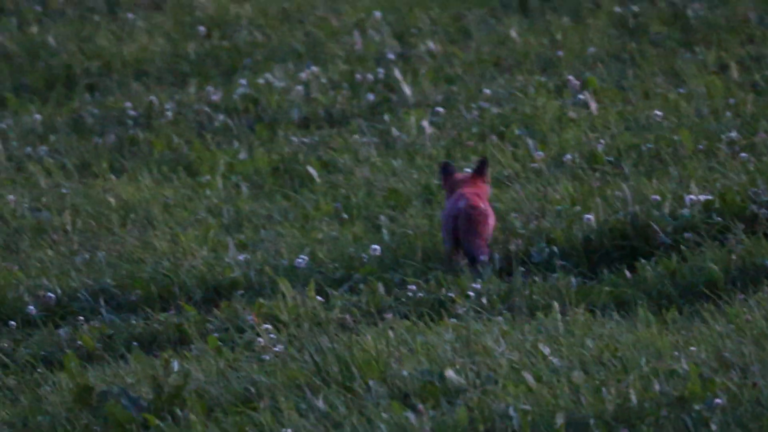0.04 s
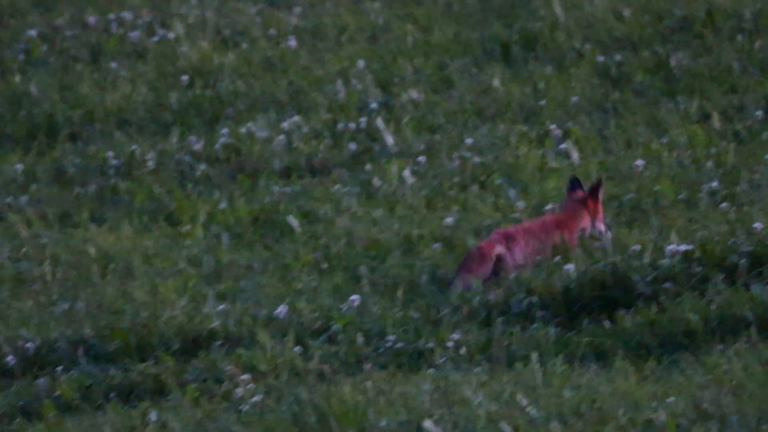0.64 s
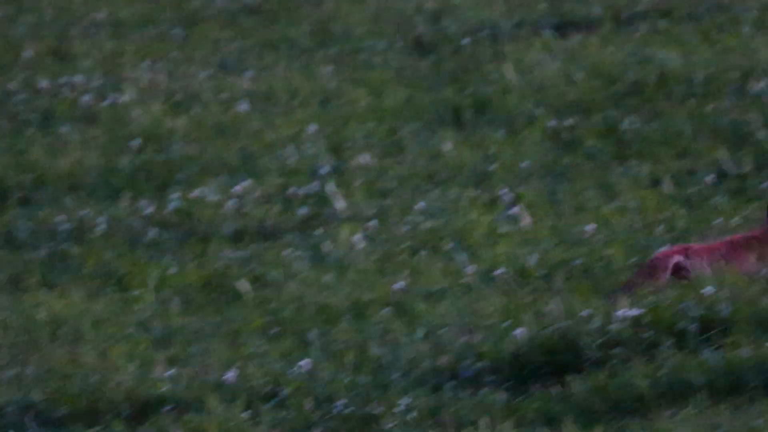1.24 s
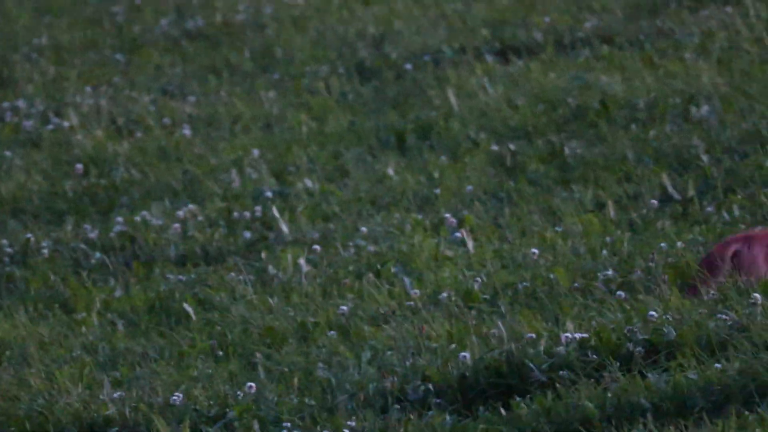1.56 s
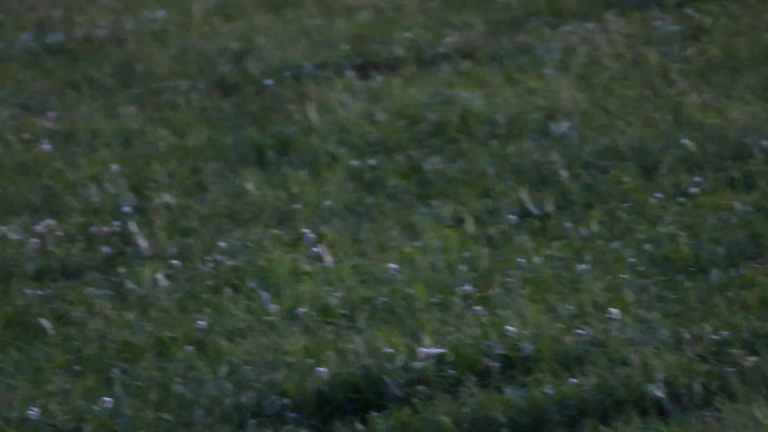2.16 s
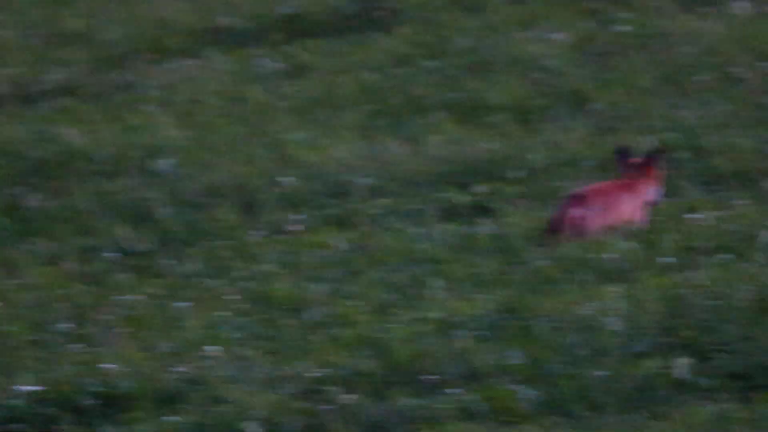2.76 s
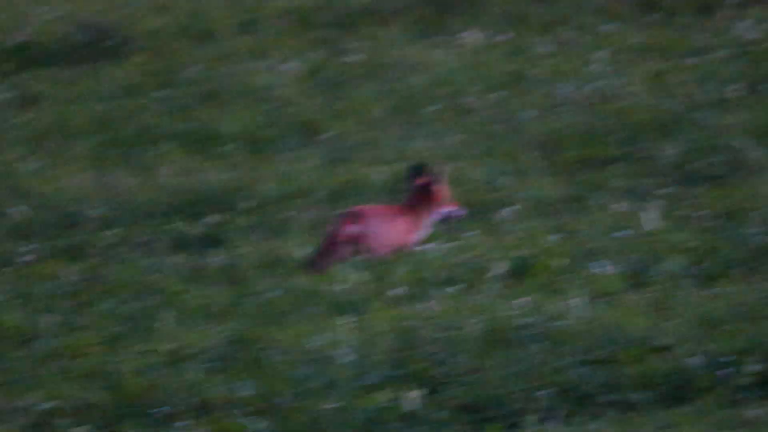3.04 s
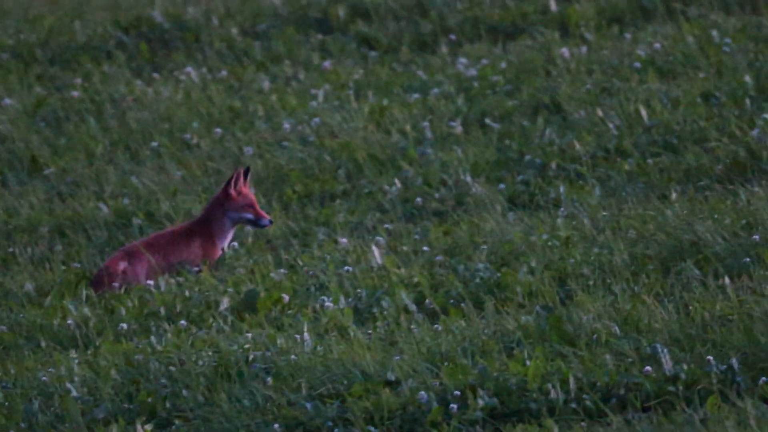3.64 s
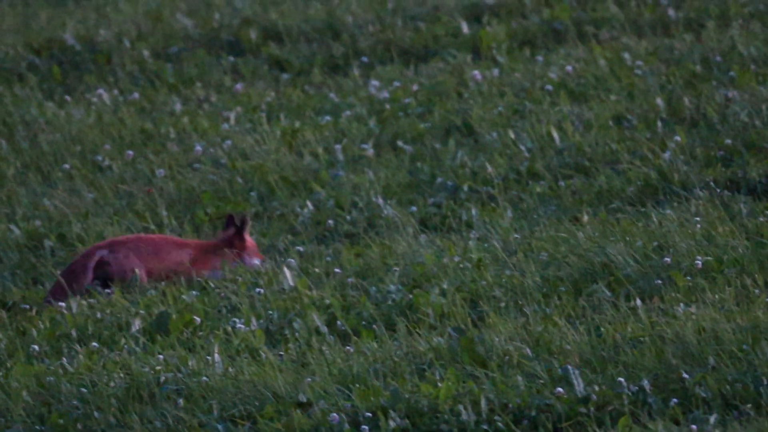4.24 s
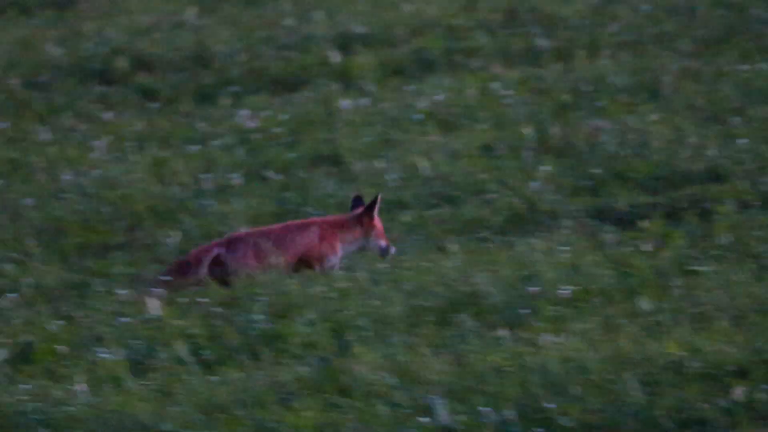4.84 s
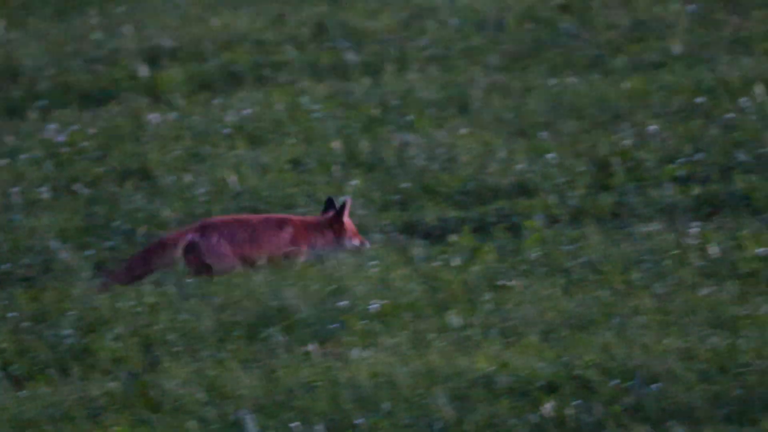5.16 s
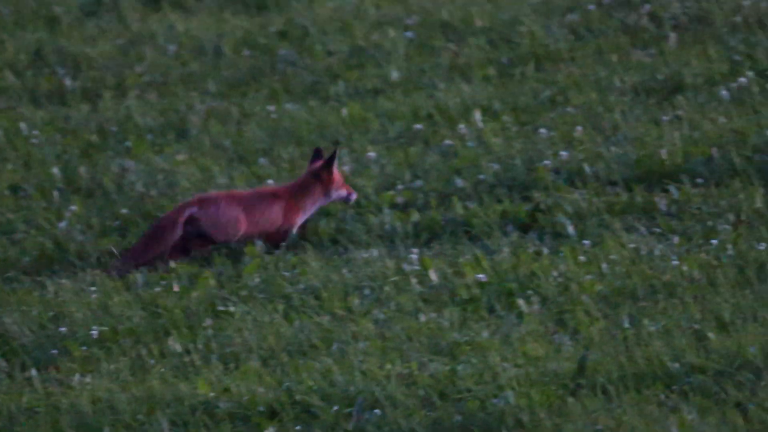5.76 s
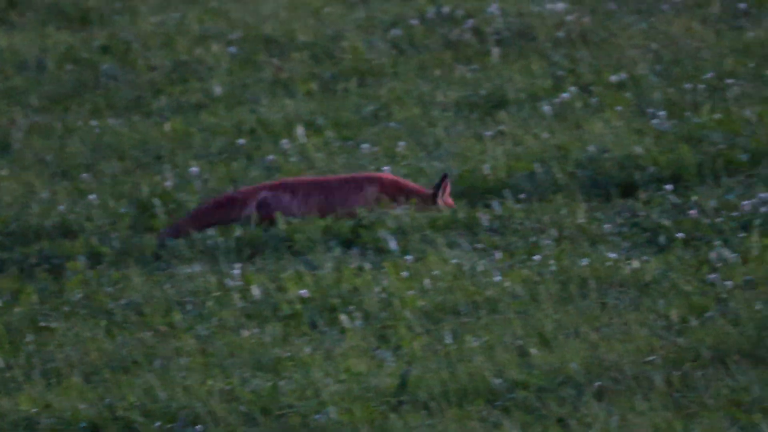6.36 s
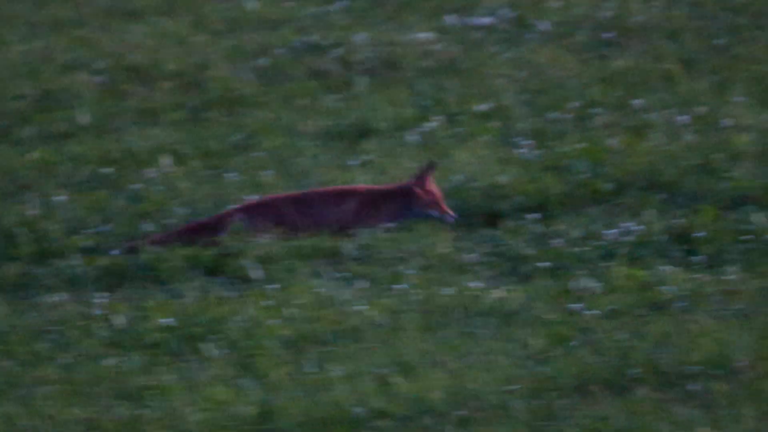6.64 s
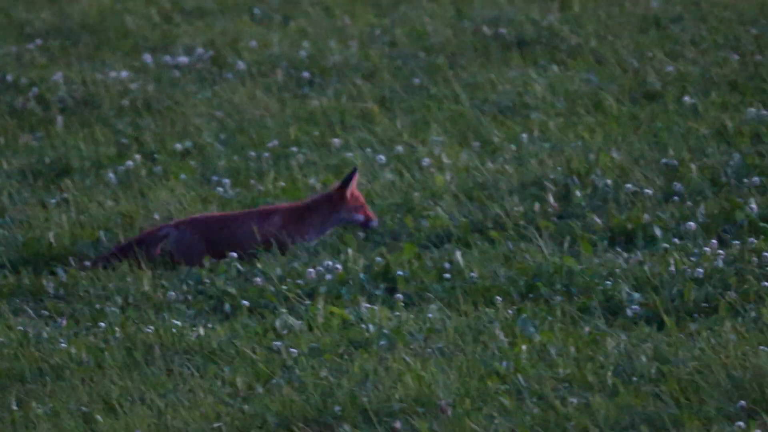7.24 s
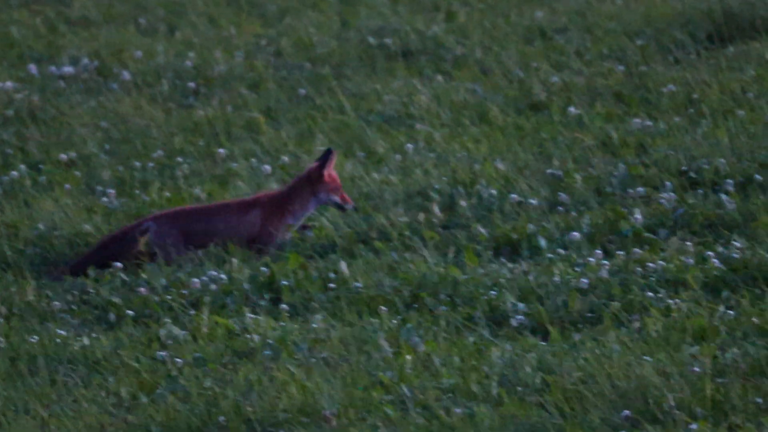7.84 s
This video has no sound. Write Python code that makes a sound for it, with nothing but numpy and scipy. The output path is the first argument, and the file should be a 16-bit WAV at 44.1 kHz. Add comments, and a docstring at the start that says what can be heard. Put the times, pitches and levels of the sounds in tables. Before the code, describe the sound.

Throughout eight seconds, several nearby bush-crickets chirr softly in very high, rasping double strokes, about nine or ten beats a second, drifting in and out of step. Behind them lie a distant insect hiss and the hush of an open meadow. Light wind bumps the microphone with low, irregular thumps and rumble, louder than the insects, from the start to 1 second, around 2, and from 2.8 to 3.7. It weakens, nearly settles between 5 and 6, then returns from 6.4 to 7.4. One insect buzzes until 0.8 seconds, and the lowest cricket stops at about 2.6. A dry stem snaps faintly at 1 second. Tiny high insect chirps come at 1.2 and 5.2. A small bird on the left gives six thin, quick ticks between 2.7 and 4.3. Grass rustles very faintly near 4 and 6.7. The crickets continue to the end.

```python
"""Bush-crickets in a meadow at dusk

Near the microphone four bush-crickets scrape their wings in double strokes, each at its own pace,
over a far insect chorus and the hush of open country. One more insect buzzes and stops, another gives
two short high chirps, and a small bird ticks to the left. Eddies of light wind bump against the
microphone; grass rustles and a dry stem snaps."""
import sys
import numpy as np
from scipy import signal
from scipy.fft import rfft, irfft, next_fast_len
from scipy.io import wavfile
from scipy.ndimage import map_coordinates

SR = 44100
rng = np.random.default_rng(int(sys.argv[2]) if len(sys.argv) > 2 else 0)


def pcm_store(signal):
    """Save signal as 16-bit PCM."""
    levels = np.round(np.clip(np.atleast_2d(signal), -1, 1) * 32767)
    wavfile.write(sys.argv[1], SR, levels.astype(np.int16).T)


N = 347949
TIME = np.arange(N) / SR
SIDES = np.array([[.5], [-.5]])  # splits a difference between left and right


def amp(db):
    return 10 ** (np.asarray(db) / 20)


def pan(left_db):
    """Channel gains for a left-right level difference."""
    return amp(left_db * SIDES)


def along(points, hz):
    """Interpolate (Hz, value) points on a log frequency axis."""
    freqs, values = np.transpose(points)
    return np.interp(np.log(hz + 1), np.log(freqs + 1), values)


def wobble(rate):
    """A smooth random curve, rate knots a second."""
    return map_coordinates(rng.standard_normal(int(N * rate / SR) + 4), [TIME * rate])


def filtered(x, response):
    """Filter x by a response given as a function of frequency."""
    size = next_fast_len(N + SR // 4)
    return irfft(rfft(x, size) * response(np.fft.rfftfreq(size, 1 / SR)), size)[..., :N]


def held(start, end, rise_db_per_s, fall_db_per_s):
    """Envelope in dB: rises to 0 at start, holds until end, falls away."""
    return -rise_db_per_s * np.maximum(start - TIME, 0) - fall_db_per_s * np.maximum(TIME - end, 0)


def swells(rows):
    """Power envelope of bell-shaped strokes (time [s], half length [s], level [dB])."""
    power = np.zeros(N)
    for at, half, db in rows:
        near = slice(*np.searchsorted(TIME, [at - 6 * half, at + 6 * half]))
        power[near] += amp(db) ** 2 * np.exp(-.5 * ((TIME[near] - at) / half) ** 2)
    return power


def scattered(power, wet_db, t60):
    """Amplitude envelope of strokes with the tail that grass and hedges scatter back."""
    decay = np.exp(-np.log(10 ** 6) / (t60 * SR))
    tail = signal.lfilter([1 - decay], [1, -decay], power)
    return np.sqrt(np.abs(power + amp(wet_db) ** 2 * tail))


def off_ground(x, delay_s, share):
    """The sound reaches the microphone directly and, slightly later, off the ground."""
    return filtered(x, lambda hz: (1 + share * np.exp(-2j * np.pi * hz * delay_s)) / np.hypot(1, share))


# Likeness of the microphone's two sides, opposed in the treble: (frequency [Hz], correlation [-1..1])
FIELD_CORRELATION = [(60, 1), (150, 0.82), (300, -0.088), (630, -0.33), (1400, -0.52), (3000, -0.58),
                     (7000, -0.63)]
def noise(spectrum, correlation=FIELD_CORRELATION):
    """Stereo noise of rms 1 with the given spectral shape and left-right correlation."""
    def response(hz):
        angle = np.arccos(np.clip(along(correlation, hz), -1, 1)) / 2
        return amp(along(spectrum, hz)) * [np.cos(angle), np.sin(angle)]
    mid, side = filtered(rng.standard_normal((2, N)), response)
    stereo = np.array([mid + side, mid - side])
    return stereo / np.sqrt(np.mean(stereo ** 2) + 1e-20)


# Open country all around: (frequency [Hz], level [dB])
HUSH_SPECTRUM = [(20, -4.5), (60, 1.5), (150, -4.5), (300, -4.5), (600, -4), (900, -7), (2000, -11.5),
                 (4000, -17), (6000, -26), (11000, -81), (15000, -75)]
def country_hush(level_db=-50):
    """A steady, dark hush behind everything."""
    return amp(level_db) * noise(HUSH_SPECTRUM)


# Insects far across the meadow: (frequency [Hz], level [dB])
CHORUS_SPECTRUM = [(4500, -15.5), (6200, -13), (7200, -2.5), (8200, -0.5), (9000, -0.5), (9700, -1),
                   (11000, -4), (12000, -12.5), (13200, -28), (15000, -60)]
def far_chorus(level_db=-49.5):
    """Distant insects blur into a shimmering hiss, the lower voices to the left."""
    shimmer_db = .2 * wobble(2) + .9 * wobble(110)
    voices = noise(CHORUS_SPECTRUM, correlation=[(7000, -.7), (9500, -.78)])
    chorus = amp(level_db + shimmer_db) * off_ground(voices, delay_s=.0035, share=.61)
    return filtered(chorus, lambda hz: pan(along([(7000, 2.5), (9000, 2.5), (11000, -1.5)], hz)))


# Faint brushes in the grass: (time [s], half length [s], level [dB])
RUSTLES = [(1.068, .008, -70), (4.049, 0.0097, -53), (4.082, .0015, -57), (6.67, .038, -64)]
# Brushing stems, and a dry one breaking: (frequency [Hz], level [dB])
RUSTLE_SPECTRUM = [(1200, -26), (2800, 5), (5500, 16), (9000, -14), (14000, -44)]
SNAP_SPECTRUM = [(1200, -8), (3000, 0), (5500, -5), (8000, -4), (12500, -10), (15000, -42)]
def grass(snap_s=1.0555, snap_half_s=.0008, snap_db=-43):
    """Stems brush together now and then, and a dry one snaps."""
    rustle = np.sqrt(swells(RUSTLES)) * noise(RUSTLE_SPECTRUM)
    snap = np.sqrt(swells([(snap_s, snap_half_s, snap_db)])) * noise(SNAP_SPECTRUM)
    return rustle + snap


# A small bird left of the microphone: (time [s], level [dB], start pitch [Hz], end pitch [Hz])
BIRD_TICKS = [(2.7047, -42, 4400, 7500), (2.9033, -40, 4400, 7500), (2.9706, -42, 4900, 7400),
              (3.713, -40.5, 4700, 7500), (3.9604, -45, 5200, 7400), (4.2867, -44.5, 4800, 7300)]
def bird(tick_s=.008, echo_s=.012, echo_db=-11.5, t60=.35):
    """Each tick is a quick upward whistle swelling towards its top; a hedge scatters it back."""
    progress = np.arange(int(tick_s * SR)) / SR / tick_s
    envelope = np.sin(np.pi * progress ** 1.5)
    ticks = np.zeros(N)
    for at, db, start_hz, end_hz in BIRD_TICKS:
        pitch_hz = start_hz + (end_hz - start_hz) * progress
        tick = envelope * np.sin(2 * np.pi * np.cumsum(pitch_hz) / SR)
        ticks[round(at * SR):][:len(tick)] += amp(db) * tick
    tail = rng.standard_normal((2, SR // 4)) * amp(-60 * np.arange(SR // 4) / SR / t60)
    tail = np.pad(tail, [(0, 0), (round(echo_s * SR), 0)])
    echo = signal.fftconvolve(ticks[None], tail / np.linalg.norm(tail[0]), axes=1)[:, :N]
    direct = off_ground(ticks, delay_s=.002, share=.5) * [[1], [-1]]  # sides in opposite phase
    return pan(7) * (direct + amp(echo_db) * echo)


# Wing strokes of a faint chirper in the meadow: (time [s], level [dB])
CHIRP_STROKES = [(1.16, -57.5), (1.192, -53.5), (1.229, -52.5), (5.165, -57.5), (5.198, -51),
                 (5.236, -50.5)]
# Its wing resonances: (frequency [Hz], level [dB])
CHIRP_WING = [(7000, -30), (9000, -5), (11000, -1), (12300, 0), (13300, -9), (14200, -22), (15000, -40)]
def high_chirper(half_s=.0055):
    """An insect gives two short high chirps of three wing strokes each."""
    power = swells([(at, half_s, db) for at, db in CHIRP_STROKES])
    envelope = scattered(power, wet_db=-5, t60=.16) * amp(1.5 * wobble(400))
    return envelope * noise(CHIRP_WING, correlation=[(10000, -.1)])


# Wing resonances of a buzzer just left of centre: (frequency [Hz], level [dB])
BUZZ_WING = [(5500, -42), (6800, -18), (7500, -11.5), (8400, -9), (9200, -18), (11000, -19), (12500, -34),
             (14500, -56)]
def buzzer(level_db=-51, end_s=.785, strokes_per_s=18.3, swing_db=3):
    """Fast wing strokes make a pulsing buzz that soon stops."""
    flutter_db = swing_db * np.cos(2 * np.pi * strokes_per_s * TIME) + 2.2 * wobble(200)
    envelope = amp(level_db + held(0, end_s, rise_db_per_s=0, fall_db_per_s=250) + flutter_db)
    return envelope * pan(1.4) * off_ground(noise(BUZZ_WING), delay_s=.003, share=.64)


# Gusts and light puffs at the microphone: (start [s], hold [s], level [dB])
GUSTS = [(0, 0.17, -35), (0.397, 0.22, -34.5), (0.754, 0.29, -38.5), (1.535, 0.28, -47),
         (1.807, 0.096, -35.5), (2.018, 0.18, -41), (2.377, 0.082, -43.5), (2.87, 0.2, -36),
         (3.036, 0.31, -33.5), (3.53, 0.048, -35.5), (4.387, 0.03, -45.5), (4.545, 0.18, -47),
         (4.8, 0.057, -47), (6.01, 0.0084, -45.5), (6.43, 0.25, -47.5), (6.83, 0.096, -42),
         (7.058, 0.11, -36), (7.224, 0.086, -39.5), (7.511, 0, -44), (7.823, 0.15, -42.5)]
def gust_strength(calm_db=-56.5, fade_s=.14, rise_share=.33):
    """Wind strength in dB; a longer gust takes longer to build and die by 20 dB."""
    gusts = [db + held(start, start + hold, 20 / (fade_s + rise_share * hold), 20 / (fade_s + hold))
             for start, hold, db in GUSTS]
    return np.maximum(np.max(gusts, axis=0), calm_db)


def small_eddies(wind_db, per_s=24, ref_half_ms=2.27, ref_db=-33, doubling_db=18):
    """Rows of (time [s], level [dB], half width [ms]); the harder eddies pass faster."""
    count = int(per_s * N / SR)
    time_jitter, level_jitter, width_jitter = (rng.random((count, 3)) - .5).T
    times = (np.arange(count) + .5 + time_jitter) / per_s
    levels_db = np.interp(times, TIME, wind_db) + 1.5 + 6 * level_jitter
    half_ms = ref_half_ms * 2 ** ((ref_db - levels_db) / doubling_db) * np.exp(.48 * width_jitter)
    return list(zip(times, levels_db, half_ms))


# The hardest eddies, single thumps right on the microphone: (time [s], level [dB], half width [ms])
THUMPS = [(.01, -26, 2.2), (.03, -16.5, 1), (.052, -17.5, 1.34), (.092, -31, 1.2), (.127, -27, 1.3),
          (.159, -22, 1.17), (.207, -30.5, 1.3), (.231, -32, 2.1), (.334, -30.5, 2), (.355, -36, 2),
          (.422, -25, 1), (.454, -25.5, 1.7), (.463, -25.5, 1.07), (.507, -19, 1.4), (.555, -30, 1.5),
          (.582, -21.5, 1.54), (.627, -28, 1.3), (.776, -25.5, 2.1), (.856, -34, 2), (.9, -31, 1.8),
          (.995, -24, 1.3), (1.047, -24, 1.12), (1.074, -30, 3.3), (1.832, -29.5, 0.88),
          (1.851, -22.5, 1.4), (1.901, -29.5, 1.45), (1.927, -28.5, 1.7), (1.971, -32, 1),
          (2.012, -33, 1.5), (2.062, -28.5, 1.6), (2.106, -27, 1.5), (2.156, -32.5, 1.5), (2.817, -29, 1.7),
          (2.851, -25, 1.64), (2.877, -26, 1.54), (2.95, -27, 1.06), (2.971, -28, 2), (3.007, -23, 1.24),
          (3.049, -35, 1.3), (3.084, -25.5, 1.44), (3.114, -24, 1.35), (3.125, -28, 1), (3.177, -28.5, 1.9),
          (3.229, -33, 1.1), (3.265, -21, 1.54), (3.274, -23.5, 1.45), (3.339, -28, 1.7),
          (3.409, -15.5, 0.94), (3.515, -26.5, 1.05), (3.552, -27.5, 2.4), (3.577, -27, 2.3),
          (3.614, -27, 2.7), (3.631, -31.5, 3.1), (3.695, -34.5, 2.8), (4.367, -25.5, 1.64),
          (4.406, -33, 2.2), (4.452, -33.5, 2.6), (4.557, -29, 2.1), (4.63, -36, 2.5), (5.505, -35, 4),
          (5.608, -39.5, 2.5), (5.837, -30, 1.43), (6.404, -36.5, 2.5), (6.487, -32.5, 2.8),
          (6.522, -34, 3.2), (6.625, -25, 1.64), (6.823, -32.5, 3.3), (6.867, -34, 3.1), (6.886, -30, 3.9),
          (6.955, -30.5, 1.1), (7.031, -34, 2.1), (7.063, -33, 2.1), (7.094, -24.5, 0.95),
          (7.107, -16, 1.68), (7.244, -25.5, 1.1), (7.342, -26, 1.9), (7.52, -38, 2.4), (7.866, -37.5, 1.3)]
# The smallest eddies, merged into a rumble: (frequency [Hz], level [dB])
RUMBLE_SPECTRUM = [(15, -7.5), (35, -1.5), (75, 1), (130, -11.5), (200, -17), (300, -20.5), (500, -64),
                   (1000, -95)]
def wind_on_microphone(leak_hz=31, rumble_db=-6.5):
    """Each passing eddy sucks, then pushes, on the diaphragm; gusts bring more force."""
    wind_db = gust_strength()
    bumps = np.zeros(N)
    for at, db, half_ms in list(THUMPS) + small_eddies(wind_db):
        near = slice(*np.searchsorted(TIME, [at - .04, at + .04]))
        offset = (TIME[near] - at) * 1000 / half_ms
        bumps[near] += amp(db) * offset * (1.2 / (1 + offset ** 2 / 5)) ** 3
    # pressure leaks past the diaphragm, so each push ends in an undershoot
    bumps = signal.lfilter(*signal.butter(1, leak_hz, "high", fs=SR), bumps)
    rumble = amp(wind_db + rumble_db + 3.35 * wobble(30)) * noise(RUMBLE_SPECTRUM, [(100, 1.0)])
    # the right side takes more of the sharp pressure changes
    lean = lambda hz: pan(along([(30, 0), (80, -5.0), (160, -6.5)], hz))
    # the sides drift out of phase towards the upper bass
    twist = lambda hz: np.exp(1j * along([(30, .22), (80, .2), (160, 1.46), (300, 1.97)], hz) * SIDES)
    return filtered(bumps + rumble, lambda hz: lean(hz) * twist(hz))


def wing_song(verses, strokes, wing, ring_hz, ring_share, correlation, wet_db, t60, wander_hz=85):
    """Twice a beat a cricket's file scrapes its wing, which rings on a wavering note inside the rasp."""
    beats = [(at, accent_db + swell * (at - start))
             for start, end, pace, accent_db, swell in verses for at in np.arange(start, end, 1 / pace)]
    power = swells([(at + delay, half, beat_db + db + .55 * rng.standard_normal())
                    for at, beat_db in beats for delay, half, db in strokes])
    rasp = scattered((1 - ring_share) * power, wet_db, t60) * noise(wing, [(9000, correlation)])
    phase = 2 * np.pi * np.cumsum(ring_hz + wander_hz * wobble(300)) / SR
    ring = np.sqrt(2 * ring_share * power) * np.sin(phase + np.arccos(correlation) * SIDES)
    return ring + rasp


# Verses of the four crickets near the microphone, just left of centre:
# (start [s], end [s], pace [beats/s], accent [dB], swell [dB/s])
BRIGHT_VERSES = [(-.041, .6, 9.82, 0, -1.5), (.672, 3.88, 9.82, -.9, 0), (3.931, 5.65, 9.645, -1.7, 0),
                 (5.707, 7.9, 9.7, -.7, -.6)]
SHRILL_VERSES = [(-.044, .62, 9.76, 1, 0), (.671, 4.27, 9.597, .7, -.3), (4.317, 5.75, 9.466, .2, 0),
                 (5.798, 7.9, 9.68, 2, -1.9)]
RESTING_VERSES = [(.053, 2.5, 8.49, -3.5, 0), (2.907, 5.35, 8.445, 0, -.3), (5.784, 7.9, 8.577, .5, -2.2)]
LOW_VERSES = [(-.045, 1.05, 9.73, .5, -1.5), (1.086, 2.6, 9.73, 2, -.8)]
# The two wing strokes of each one's beat: (delay [s], half length [s], level [dB])
BRIGHT_STROKES = [(0, .0028, -1), (.035, .0036, 0)]
SHRILL_STROKES = [(0, .003, -1), (.035, .0038, 0)]
RESTING_STROKES = [(0, .0035, -1), (.0405, .0048, 0)]
LOW_STROKES = [(0, .003, -4), (.047, .004, 0)]
# Their wing resonances: (frequency [Hz], level [dB])
BRIGHT_WING = [(6000, -40), (8500, -15), (9400, -7), (9750, -1), (10100, 0), (10600, -6), (11700, -10),
               (12300, -17), (13500, -28), (15000, -55)]
SHRILL_WING = [(6000, -42), (7800, -19), (8500, -7), (9000, 0), (9400, -7), (10500, -17), (12500, -27),
               (15000, -58)]
RESTING_WING = [(6000, -42), (8200, -16), (8900, -3), (9300, -1), (9650, 0), (10200, -6), (11000, -15),
                (12500, -27), (15000, -58)]
LOW_WING = [(6000, -40), (7300, -4.5), (8000, -4), (8650, 0.5), (9100, -4), (10500, -6.5), (12500, -22),
            (15000, -56)]
def near_crickets():
    """Four bush-crickets, each on its own note, drift in and out of step; the low one stops early."""
    bright = wing_song(BRIGHT_VERSES, BRIGHT_STROKES, BRIGHT_WING,
                       ring_hz=10000, ring_share=.35, correlation=-.92, wet_db=1, t60=.22)
    shrill = wing_song(SHRILL_VERSES, SHRILL_STROKES, SHRILL_WING,
                       ring_hz=8960, ring_share=.6, correlation=-.82, wet_db=-1, t60=.15)
    resting = wing_song(RESTING_VERSES, RESTING_STROKES, RESTING_WING,
                        ring_hz=9520, ring_share=.4, correlation=-.35, wet_db=-4.5, t60=.12)
    low = wing_song(LOW_VERSES, LOW_STROKES, LOW_WING,
                    ring_hz=8600, ring_share=.35, correlation=-.4, wet_db=-4, t60=.12)
    return (amp(-47.4) * pan(1.0) * bright + amp(-49) * pan(.42) * shrill
            + amp(-49.9) * pan(.48) * resting + amp(-49.3) * pan(1.4) * low)


def scene():
    """The meadow from one stereo microphone standing in the breeze."""
    background = country_hush() + far_chorus() + grass() + bird()
    return background + high_chirper() + buzzer() + wind_on_microphone() + near_crickets()


def record(dry, top_hz=15100):
    """The recorder keeps nothing above its band limit."""
    return filtered(dry, lambda hz: hz < top_hz)


dry = scene()
out = record(dry)
pcm_store(out)
```